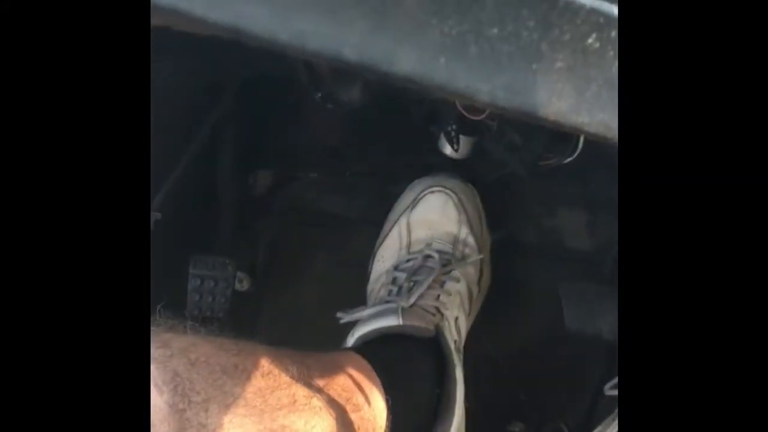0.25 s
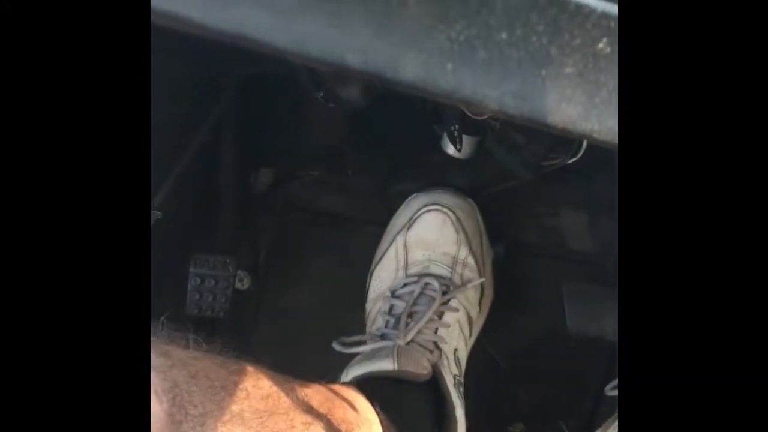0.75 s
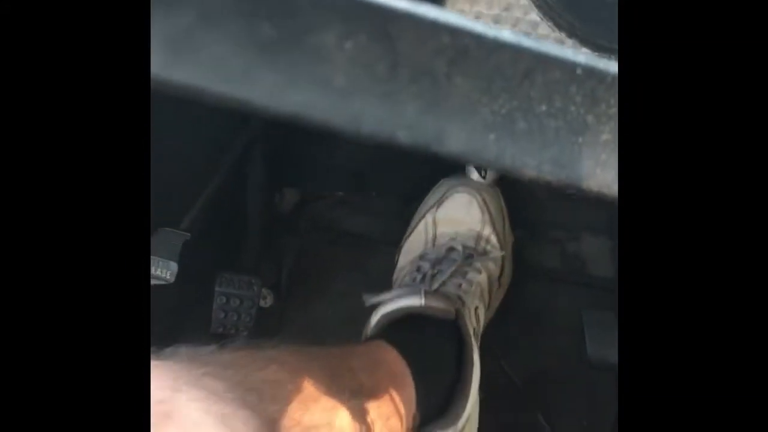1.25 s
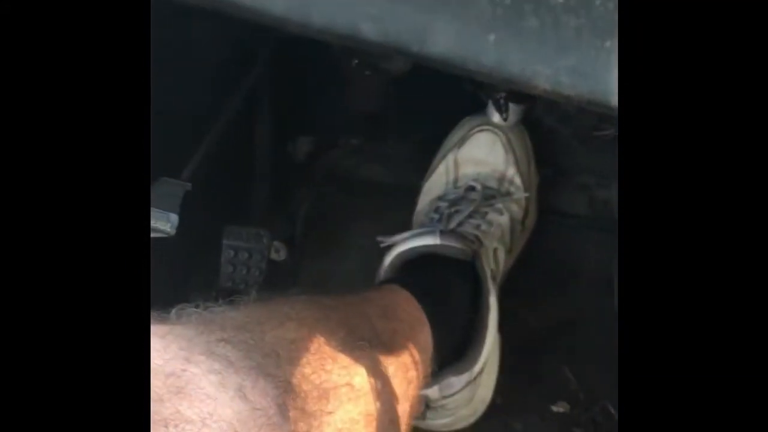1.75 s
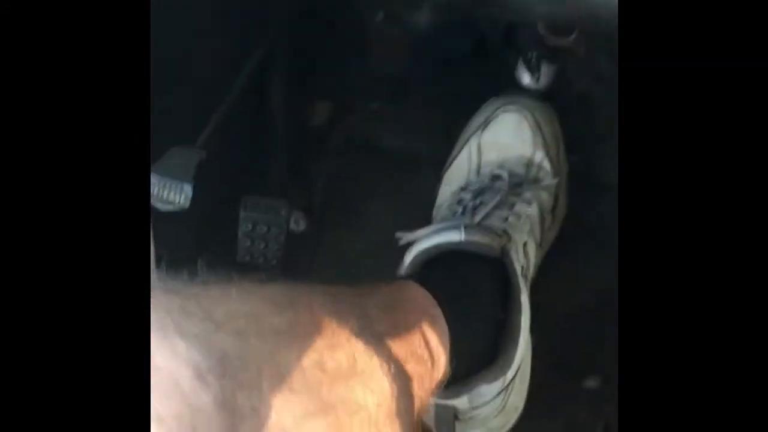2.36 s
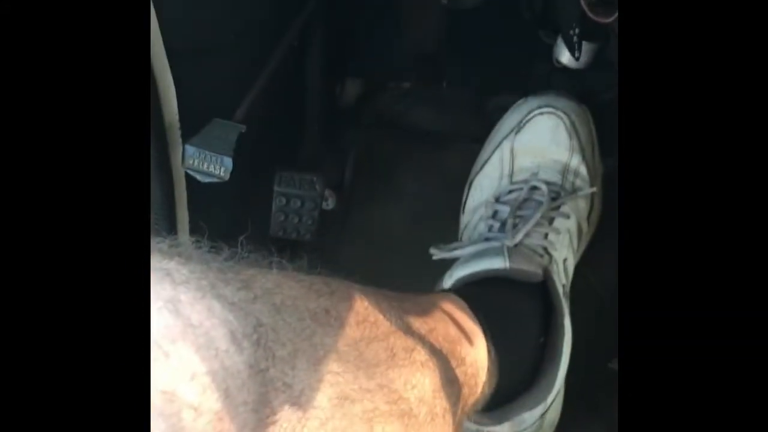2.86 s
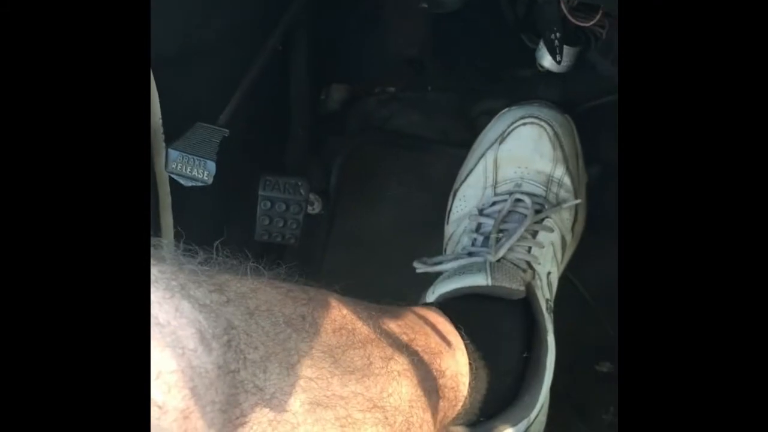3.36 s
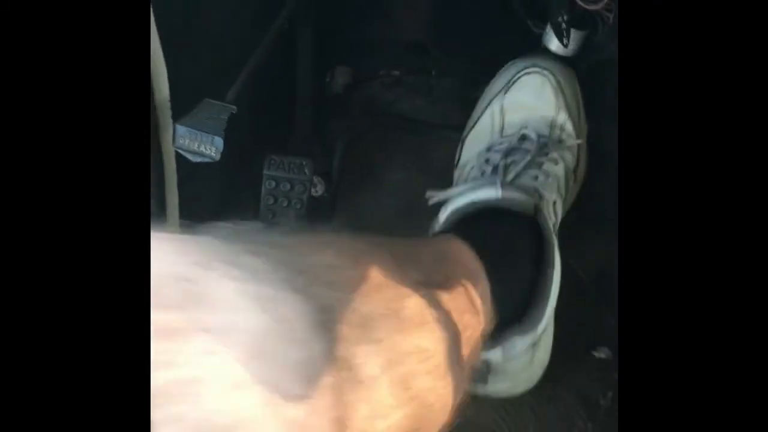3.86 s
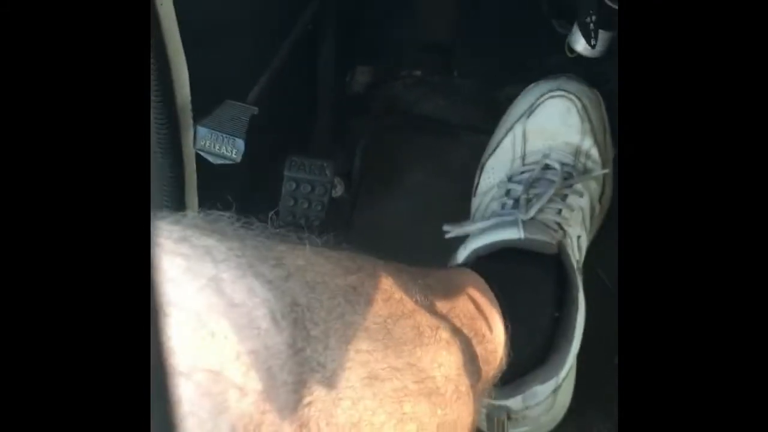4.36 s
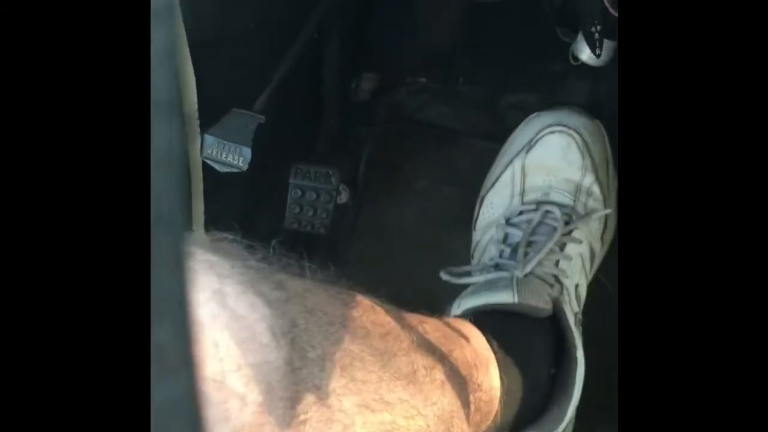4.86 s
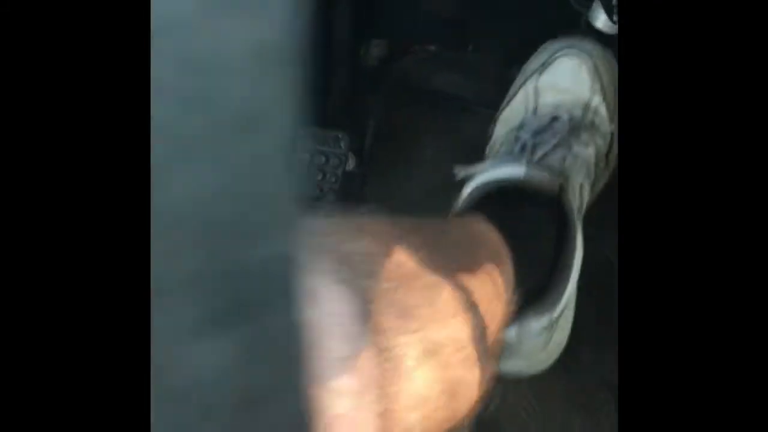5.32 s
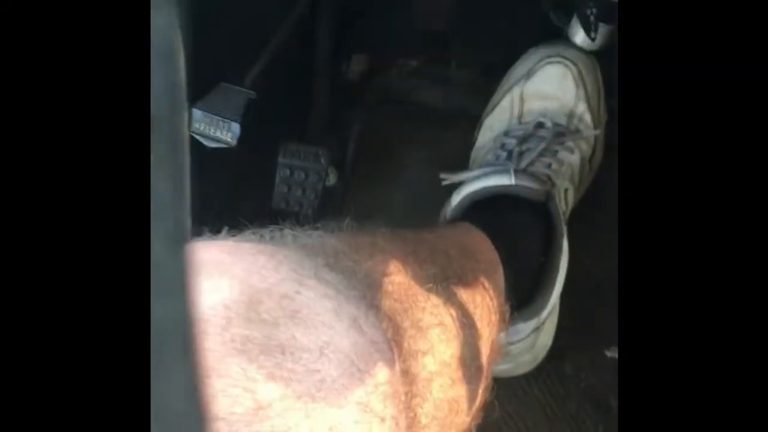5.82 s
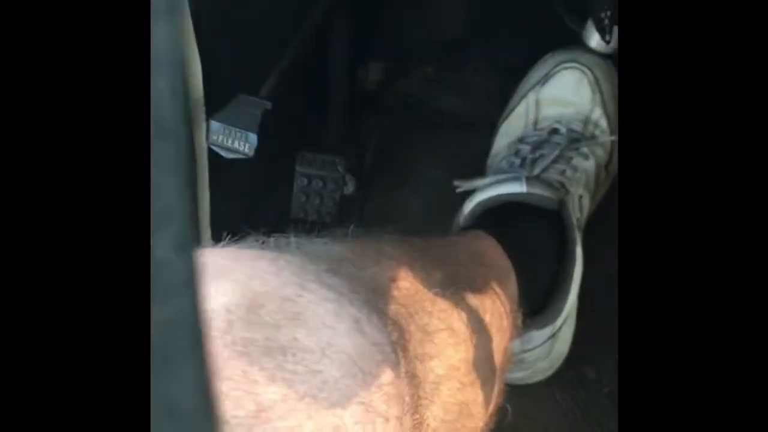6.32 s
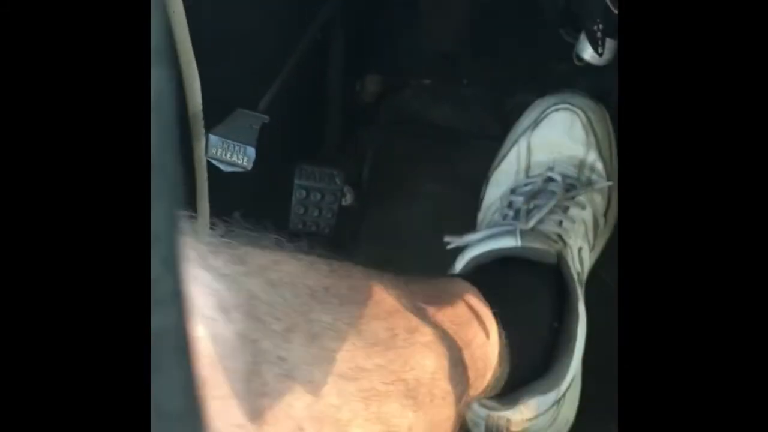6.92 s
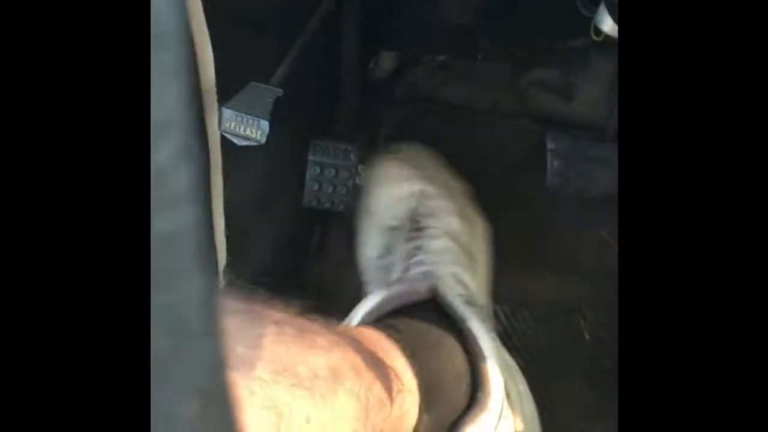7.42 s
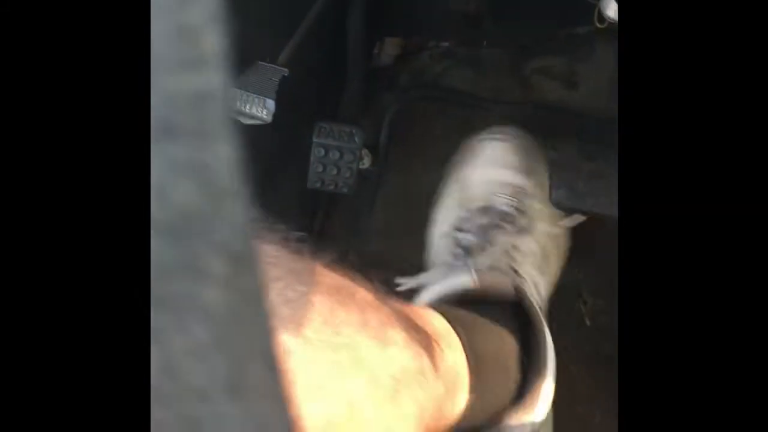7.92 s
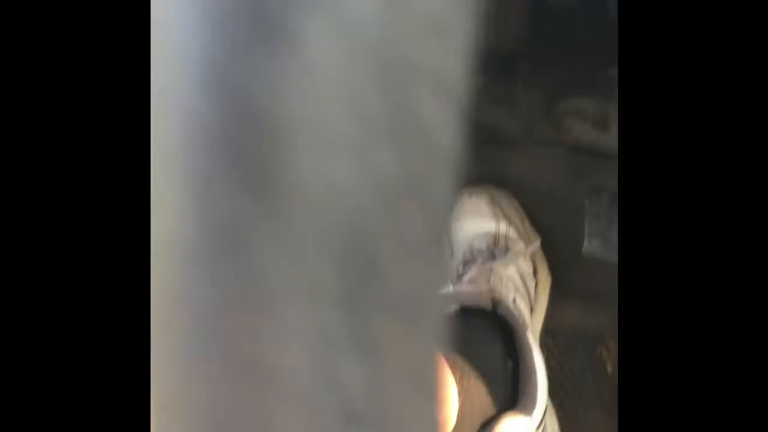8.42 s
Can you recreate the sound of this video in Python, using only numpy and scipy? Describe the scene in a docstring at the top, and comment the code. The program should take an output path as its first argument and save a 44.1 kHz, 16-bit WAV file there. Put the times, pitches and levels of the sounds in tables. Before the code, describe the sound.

An old six-cylinder engine with open exhaust is revved unevenly, booming and sagging, as pedal linkage snaps and clicks, ending on a lumpy fast idle.

```python
"""An old six-cylinder engine with an open exhaust, heard from the footwell of the parked car.
It is already running; feathered throttle makes pulses, hiss, clatter and panel rattle swell and wander.
Rubbing metal squeaks from 1.1 s as gliding tones; around 2 s the revs sag and erratic burning roughens them.
A foot bumps the floor at 5.3 s; noisy, ringing pedal-linkage snaps crowd in from 6 s, the hardest at 7.8 s.
From 7.3 s the engine climbs to a fast idle, its uneven cylinders still giving the exhaust pulses a lope."""
import sys
import numpy as np
from scipy import signal
from scipy.fft import rfft, irfft, next_fast_len
from scipy.io import wavfile
from scipy.ndimage import uniform_filter1d

SR = 44100
rng = np.random.default_rng(int(sys.argv[2]) if len(sys.argv) > 2 else 0)


def wav_record(signal):
    """Record a signal, one row per channel, as 16-bit PCM in the file named by sys.argv[1]."""
    frames = np.transpose(np.atleast_2d(signal))
    bounded = np.clip(frames, -1, 1)
    # unit amplitude maps onto the largest positive 16-bit level
    quanta = np.round(bounded * 32767).astype(np.int16)
    wavfile.write(sys.argv[1], SR, quanta)


def invert_db(level):
    """Linear amplitude ratio for a level in decibels (20 dB per decade), elementwise."""
    return 10 ** (np.asarray(level, dtype=float) / 20)


N = 382788

# turning points of the engine speed: t/s, firing rate/Hz
SPEED = [(0.0, 90.6), (0.16, 106), (0.42, 95), (0.5, 95), (0.75, 108.5), (1.0, 98), (1.2, 104), (1.53, 83),
         (1.72, 89), (2.08, 71.7), (2.3, 63), (2.4, 66), (2.57, 85), (2.8, 86), (2.92, 84), (3.06, 92.5),
         (3.2, 93.5), (3.28, 82), (3.44, 85), (3.68, 82.8), (3.84, 86), (4.1, 70.5), (4.23, 69), (4.47, 92),
         (4.58, 93), (4.88, 86.7), (5.14, 71.5), (5.3, 66.8), (5.44, 69.5), (5.63, 68.3), (5.78, 76.5),
         (5.84, 75.6), (6.17, 60), (6.32, 65.6), (6.48, 67.3), (6.6, 73.2), (6.82, 65), (7.08, 60.5),
         (7.28, 65.5), (7.76, 90.6), (8.08, 98), (8.68, 102)]
# burning outside the stumbles: t/s, pulse level/dB, cylinder unevenness (0 = even),
# extra level of the upper resonances/dB
LOAD = [(0.0, -7.5, 0.42, -4), (0.18, -5.5, 0.55, 4.5), (0.24, -6.5, 0, -4), (0.35, -7.5, 0.17, -10),
        (0.42, -9.5, 0.28, -4.5), (0.76, -6, .4, 7.5), (0.95, -8.5, 0.45, -2), (1.2, -7.5, 0.32, -1.5),
        (1.26, -5.5, 0.17, -5.5), (1.46, -9.5, .08, -3.5), (1.68, -11.5, 0.28, 1.5), (1.86, -11, 0.17, 0.5),
        (2.0, -17.5, .7, 5), (2.3, -17, 1.1, 5.5), (2.54, -5, 0.64, -4), (2.66, -12.5, 0.75, 3),
        (2.82, -11, 0.68, 5.5), (2.98, -7.5, 0.77, -3), (3.12, -12, 0.62, 1), (3.44, -9, .5, -3),
        (3.7, -10, 0.52, -2.5), (4.0, -15, 0.37, -0.5), (4.4, -9, 0.56, -2.5), (4.7, -12, 0.63, 1.5),
        (5.04, -11.5, .6, -2.5), (5.36, -16, 0.85, 1), (5.76, -10, 0.91, -1.5), (6.0, -15, 0.86, 1),
        (6.24, -13, 1.37, -1.5), (6.48, -10, 0.95, 2), (6.7, -13, 0.81, 3.5), (6.96, -12, 0.76, 7.5),
        (7.28, -7, 0.72, 0), (7.55, -4.5, .6, 3), (7.8, -11, 0.77, 4.5), (8.1, -9.5, 0.46, 4.5),
        (8.68, -9, 0.88, 1)]
# cylinders in firing order, both scaled by unevenness: added share of pulse strength, extra delay/ms
CYLINDERS = [(-0.33, 0.94), (0.78, 0.5), (0.35, 1.72), (0.71, 1.03), (-0.083, -2), (0.4, 1.78)]
# exhaust pipe and cabin boom: f/Hz, width/Hz, level/dB
PIPE = [(36.4, 22.53, -3.5), (91.16, 15, 1.5), (144.5, 12.2, -10), (200.4, 10.1, -10.5),
        (285.7, 21.1, -14.5), (268.3, 15, -17), (358, 20.7, -34.5), (523.7, 12, -43)]
# valve clatter spectrum, shape only: f/Hz, level/dB
CLATTER = [(240, -25.5), (400, 5.5), (428, -0.5), (458, -13.5), (499, -4), (555, -9), (611, -1.5),
           (770, -5), (989, -7), (1100, -9), (1560, -11.5), (2880, -21), (4000, -25.5), (5200, -47.5),
           (8800, -120)]
# intake hiss spectrum, shape only: f/Hz, level/dB
HISS = [(1180, -32), (2000, -1.5), (2880, -8), (3710, -6), (4940, -10), (5490, -8.5), (6310, -11),
        (8400, -11.5), (10500, -17), (15100, -19), (16000, -26)]
# snaps of the pedal linkage: t/s, strength/dB, thud level/dB (before trims), t60/s, strongest ring f/Hz
CRACKS = [(1.639, -39, 9.5, 0.045, 2810), (5.4305, -42.5, -20, 0.025, 3440),
          (5.637, -40.5, 10.5, 0.11, 2510), (6.0706, -40, -4, 0.07, 2500), (6.1635, -27.5, 5, 0.065, 2660),
          (6.216, -26.5, 5.5, 0.055, 6200), (6.3906, -27.5, -0.5, 0.091, 7910),
          (6.516, -29, 8.5, 0.077, 2700), (6.6278, -25.5, 3, 0.091, 6550), (6.6391, -23.5, 5, 0.07, 2740),
          (6.6679, -24, -14, 0.078, 2870), (6.8216, -24, 2.5, 0.069, 4370), (6.833, -34.5, 11, 0.023, 2520),
          (6.939, -25.5, -6, 0.047, 4400), (6.9872, -20.5, -3.5, 0.077, 4500),
          (7.1681, -25, 1.5, 0.097, 4340), (7.2898, -34, -2, 0.079, 2890), (7.353, -23.5, -17, 0.087, 2620),
          (7.6705, -38.5, 8, 0.07, 2850), (7.7829, -0.5, -11.5, 0.047, 4080),
          (7.7898, -7, -0.5, 0.056, 12500), (7.802, -16.5, 1.5, 0.061, 3160), (7.863, -47, 16, 0.091, 2660),
          (7.993, -41.5, -10, 0.052, 3510), (8.04, -32.5, -12.5, 0.07, 3020),
          (8.1894, -23, -9, 0.062, 7900), (8.327, -34, -6, 0.07, 3160), (8.505, -28, 6, 0.07, 3300)]
# ringing modes of the linkage: f/Hz, level/dB, t60/s
LINKAGE = [(2480, -4, .05), (2840, -1, .047), (3170, -2, .05), (4080, -8, .05), (4440, -5, .045),
           (4620, -4, .045), (5300, 0, .04), (6200, -6, .05), (6950, -6, .05), (7900, -6, .04),
           (9400, -7, .045), (12500, -7, .04)]
# noise burst of a snap, shape only: f/Hz, level/dB
SPIT = [(710, -39), (1200, -11.5), (1900, -14), (3140, -0.5), (5370, -6), (5790, -3), (8510, -3.5),
        (15500, -18)]
# body panels and linkage that ring when shaken: f/Hz, width/Hz, level/dB
PANELS = [(513.6, 33, -2.5), (626, 78, -1), (714, 28, -6.5), (977, 72, -3.5), (1406, 72, -18),
          (1570, 110, -10), (1880, 68, -9.5), (2138, 71, -10), (2460, 32, -24), (3580, 190, -13),
          (3800, 77, -18.5), (4230, 61, -15.5), (5470, 180, -17.5), (8050, 130, -22)]
# short squeaks of rubbing metal: t/s, length/s, start f/Hz, end f/Hz, level/dB
SQUEAKS = [(1.121, 0.035, 12300, 12850, -44), (1.469, 0.023, 2470, 2420, -50),
           (2.013, 0.033, 2490, 2430, -51), (2.433, 0.035, 3600, 3700, -45),
           (3.311, 0.019, 1590, 1600, -41.5), (4.369, 0.015, 3740, 3800, -45),
           (4.36, 0.023, 4230, 4200, -45.5), (4.763, 0.023, 1460, 1570, -42),
           (7.752, 0.021, 2700, 2800, -41)]
# the foot bumps the floor pan: t/s, length/s, start f/Hz, end f/Hz, level/dB
THUMP = (5.325, .075, 48, 38, -9)
# the engine stumbles and its boom drops: middle t/s, length/s, depth/dB
STUMBLES = [(.11, 0.14, 5.5), (0.21, 0.044, 4.5), (0.58, .3, 5), (1.07, 0.57, 2.5), (1.212, 0.049, 5.5),
            (1.525, .14, 8), (1.619, 0.11, 4.5), (1.759, .12, 10), (2.09, 0.16, 9), (2.241, 0.18, 3.5),
            (2.879, 0.14, 5.5), (3.224, 0.15, 16), (3.531, 0.097, 3.5), (4.134, 0.27, 8.5), (4.6, 0.17, 2),
            (5.176, 0.05, 6), (5.254, 0.14, 1), (5.504, 0.38, 7), (5.723, 0.037, 3), (5.863, 0.046, 4),
            (6.016, .07, 3.5), (6.143, 0.12, 9), (6.356, 0.17, 5.5), (6.623, 0.07, 4), (6.752, 0.099, 1),
            (6.846, 0.048, 8), (7.123, 0.2, 6)]
# pedal presses, heard as intake hiss: t/s, time until let go/s, hiss level/dB, release/(dB/s)
PRESSES = [(-.08, 0.15, -49.5, 50.5), (.35, 0.24, -55.5, 20.5), (.6, 0.38, -54.5, 17.5),
           (1.6, .1, -64.5, 15), (2.28, 0.25, -54, 23.5), (2.62, 0.27, -62, 20), (2.88, 0.15, -53, 44.5),
           (3.25, 0.13, -54.5, 24), (3.55, 0.15, -57, 55), (4.2, 0.26, -55.5, 31.5),
           (4.68, 0.48, -57, 26.5), (5.3, 0.098, -63.5, 119.5), (5.51, 0.05, -55.5, 19),
           (5.62, 0.054, -58, 40.5), (6.05, 0.28, -61.5, 20.5), (6.33, 0.23, -56.5, 19),
           (6.62, .07, -56.5, 71.5), (6.8, 0.45, -56.5, 19), (7.22, 0.56, -53.5, 10), (7.9, .8, -57.5, 10)]
# the microphone drifts through a cabin standing wave, which sets the highest resonances: t/s, level/dB
CABIN = [(0.0, -4), (0.55, 1), (0.7, -11), (0.92, -1.5), (1.3, 0), (2.4, -1.5), (2.65, 4.5), (3.0, 0),
         (5.0, -1.5), (6.8, 0), (7.2, -2), (7.6, 1.5), (8.68, 2.5)]

PRESS_S, SHUT_DB = 0.084, -64  # time to push the pedal down; hiss with the throttle closed
CLATTER_DB, PANELS_DB = -46, -49.5
PEAK_KNOCKS_PER_S = 5500  # just after a firing
SNAP_RISE_S, HARD_RISE_S, THUD_LAG_S = 0.0002, 0.0022, 0.0073  # harder snaps build longer
BRIGHTER_PER_DB = 0.14  # harder snaps are brighter
SPARED = 0.48  # share of a stumble that the upper resonances do not lose
UNEVEN_PER_STUMBLE_DB = 0.21  # cylinders differ more in a stumble
MIC_LOW_HZ, PULSE_TOP_HZ = 18.7, 650  # microphone roll-off; pulses last about a millisecond
UPPER_HZ, CABIN_HZ = 170, 240  # lower limits of the upper and the highest resonances
FLYWHEEL_S = 0.06  # inertia rounds the turns of the speed


def evened(x):
    """Scales to rms 1."""
    return x / np.sqrt(np.mean(x ** 2) + 1e-20)


def curves(rows):
    """Every column of a table after the time, one value a sample."""
    s, *columns = np.transpose(rows)
    return [np.interp(np.arange(N) / SR, s, c) for c in columns]


def coloured(x, points):
    """Filters x by the spectrum of the points, joined on a log frequency scale."""
    f, db = np.transpose(points)
    hz = np.fft.rfftfreq(len(x), 1 / SR)
    gain = invert_db(np.interp(np.log(hz + 1), np.log(f + 1), db))
    return irfft(rfft(x) * gain, len(x))


def add(mix, s, sound):
    """Mixes a sound in at s seconds."""
    part = mix[round(s * SR):][:len(sound)]
    part += sound[:len(part)]


def throttle():
    """Intake hiss in dB: each press rises, holds and lets go, above the closed throttle."""
    t = np.arange(0, N, 64) / SR
    power = invert_db(2 * SHUT_DB)
    for s, held, db, release in PRESSES:
        opening = np.clip((t - s) / PRESS_S, 0, 1)
        press_db = db - release * np.maximum(t - s - held, 0)
        power = power + opening ** 2 * invert_db(2 * press_db)
    return np.interp(np.arange(N) / SR, t, 10 * np.log10(power))


def air(turns):
    """Intake hiss and valve clatter: noise that puffs with each firing and swells as the throttle opens."""
    hiss_db = throttle()
    puff = np.exp(-(turns % 1) / 0.5)
    lope = np.cos(2 * np.pi * turns / len(CYLINDERS))
    hiss_noise, clatter_noise = rng.standard_normal((2, N))
    hiss = evened(coloured(hiss_noise, HISS) * (1 + 0.5 * puff))
    clatter = evened(coloured(clatter_noise, CLATTER) * (1 + 0.53 * puff + 0.18 * lope))
    clatter_db = CLATTER_DB + 0.94 * (hiss_db - np.mean(hiss_db))
    return invert_db(hiss_db + 0.5) * hiss + invert_db(clatter_db) * clatter


def rattle(turns):
    """Dense small knocks, bunched after each firing, each ring one panel; harder with the throttle open."""
    hiss_db = throttle()
    chance = PEAK_KNOCKS_PER_S / SR * np.exp(-(turns % 1) / 0.4)
    strength = invert_db(3.5 * np.minimum(rng.exponential(1, N), 4))
    knocks = strength * (rng.random(N) < chance)
    panel = rng.integers(0, len(PANELS), N)
    t = np.arange(SR // 8) / SR
    build = 1 - np.exp(-t / 0.00067)
    rings = np.zeros(N)
    for k, (hz, width, db) in enumerate(PANELS):
        decay = np.sqrt(width) * np.exp(-np.pi * width * t)
        ring = invert_db(db) * decay * build * np.sin(2 * np.pi * hz * t)
        rings += signal.oaconvolve(knocks * (panel == k), ring)[:N]
    return invert_db(PANELS_DB + 1.36 * (hiss_db - np.mean(hiss_db))) * evened(rings)


def glide(length, from_hz, to_hz, db):
    """A squeak of rubbing metal or a bump on the floor: a brief gliding tone that swells and fades."""
    hz = np.linspace(from_hz, to_hz, round(length * SR))
    return invert_db(db) * np.hanning(len(hz)) * np.sin(2 * np.pi * np.cumsum(hz) / SR)


def crack(db, thud_db, t60, ring_hz):
    """A loose metal joint snaps over: a burst of noise, the rods ringing, and a duller thud."""
    t = np.arange(SR // 8) / SR
    spit_noise, thud_noise = rng.standard_normal((2, len(t)))
    build = 1 - np.exp(-t / (SNAP_RISE_S + HARD_RISE_S * invert_db(db)))
    fall = invert_db(-60 * t / max(t60, 0.02)) * build

    ring = np.zeros(len(t))
    for hz, mode_db, mode_t60 in LINKAGE:
        # modes near the strongest ring most, with some luck
        near_db = 9 - 9 * abs(np.log2(hz / ring_hz)) - 8 * rng.random()
        tone = np.sin(2 * np.pi * (hz * t + rng.random()))
        ring += invert_db(mode_db + near_db - 5 - 60 * t / mode_t60) * tone

    thud_colour = [(350, -21), (550, 7.5), (700, 4), (900, -1), (1150, -4.5), (2300, -9), (4500, -39.5)]
    thud = evened(coloured(thud_noise, thud_colour)) * (1 - np.exp(-(t / THUD_LAG_S) ** 2)) * invert_db(4)
    top_hz, top_db = SPIT[-1]
    spit_colour = SPIT[:-1] + [(top_hz, top_db + BRIGHTER_PER_DB * (db + 28))]
    spit = evened(coloured(spit_noise, spit_colour))
    return invert_db(db - 11.5) * ((spit + invert_db(thud_db + 3.5) * thud) * fall + ring)  # peak to rms


def burning(at):
    """Pulse dB, unevenness and upper dB of the firings at these samples; stumbles weaken the boom."""
    pulse_db, uneven, sharp_db = (c[at] for c in curves(LOAD))
    lost_db = np.zeros(len(at))
    for s, length, db in STUMBLES:
        lost_db += db * np.cos(np.pi * np.clip((at / SR - s) / length, -0.5, 0.5)) ** 2
    uneven = np.clip(uneven + UNEVEN_PER_STUMBLE_DB * lost_db, 0, 1.6)
    return pulse_db - lost_db, uneven, sharp_db + SPARED * lost_db


def pipe(hz, low_hz, high_hz):
    """Complex response, exhaust port to microphone, of the resonances in a range, alternate in sign."""
    modes = 0
    for k, (f, width, db) in enumerate(PIPE):
        if low_hz < f <= high_hz:
            modes = modes + (-1) ** k * invert_db(db) * 1j * hz * width / (hz ** 2 - f ** 2 - 1j * hz * width)
    microphone = (1j * hz / (MIC_LOW_HZ + 1j * hz)) ** 4
    return modes * microphone / (1 + 1j * hz / PULSE_TOP_HZ) ** 2


def exhaust(turns, rate):
    """One pressure pulse a firing; under load the cylinders differ in strength and timing, and burn by chance."""
    at = np.flatnonzero(np.diff(np.floor(turns)) > 0)
    pulse_db, uneven, sharp_db = burning(at)
    cylinder = np.floor(turns[at + 1]).astype(int) % len(CYLINDERS)
    share, delay_ms = np.transpose(CYLINDERS)[:, cylinder]
    spread = 0.04 + 0.15 * np.clip((78 - rate[at]) / 12, 0, 1)  # burning gets erratic at low speed
    chance = rng.standard_normal((len(at), 2)) * spread[:, None]
    area = SR / rate[at] / np.sqrt(2)  # gives a firing line of rms 1 at the port
    size = area * invert_db(pulse_db) * (1 + uneven * share + chance[:, 0])
    late = (uneven * delay_ms + chance[:, 1]) * SR / 1000
    where = np.clip(at + late.astype(int), 0, N - 1)

    padded = next_fast_len(N + SR)
    hz = np.fft.rfftfreq(padded, 1 / SR)
    pulses = np.zeros((3, padded))  # one train for each range of resonances
    cabin_db = curves(CABIN)[0][at]
    pulses[:, where] = size, size * invert_db(sharp_db), size * invert_db(sharp_db + cabin_db)
    # already running: two full cycles also come before the start
    pulses[:, -at[12]:] = pulses[:, :at[12]]
    bands = [(0, UPPER_HZ), (UPPER_HZ, CABIN_HZ), (CABIN_HZ, SR)]
    heard = sum(rfft(train) * pipe(hz, *band) for train, band in zip(pulses, bands))
    return irfft(heard, padded)[:N]


def scene():
    """Intake air, rattles and exhaust, with the snaps, squeaks and thump laid over."""
    rate = uniform_filter1d(curves(SPEED)[0], round(FLYWHEEL_S * SR), mode="nearest")
    turns = np.cumsum(rate) / SR + 0.3  # firings so far
    mix = air(turns) + rattle(turns) + exhaust(turns, rate)
    for s, *row in SQUEAKS + [THUMP]:
        add(mix, s, glide(*row))
    for s, *row in CRACKS:
        add(mix, s, crack(*row))
    return mix[None]


def roll_off(x):
    """The treble ends steeply here."""
    return signal.sosfilt(signal.butter(12, 16000, fs=SR, output="sos"), x)


def record(dry):
    """Full scale clips any higher peaks."""
    mix = np.clip(dry, -1, 1)
    return roll_off(mix)


dry = scene()
out = record(dry)
wav_record(out)
```